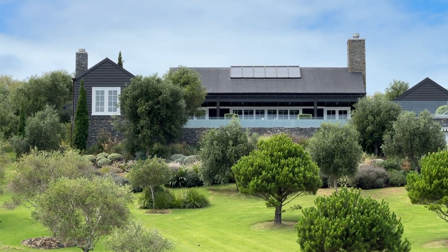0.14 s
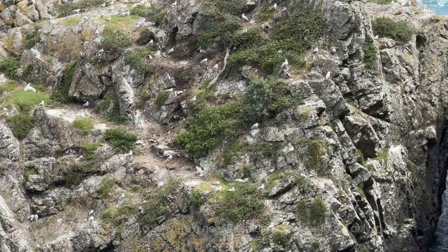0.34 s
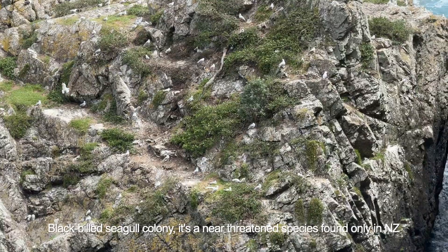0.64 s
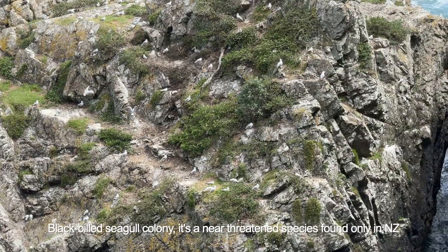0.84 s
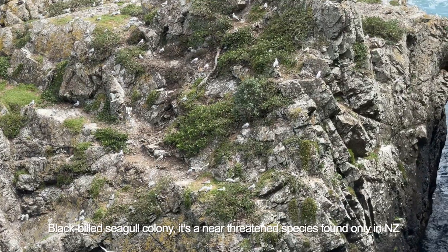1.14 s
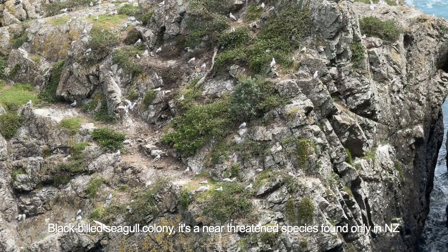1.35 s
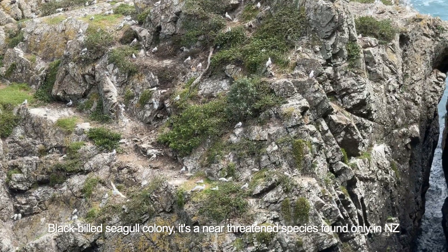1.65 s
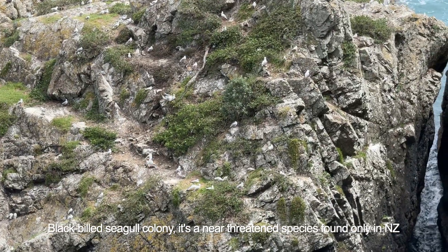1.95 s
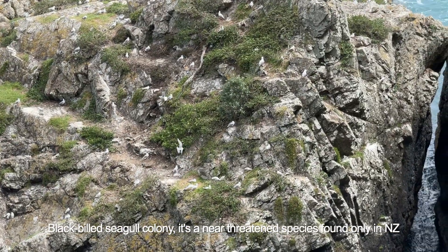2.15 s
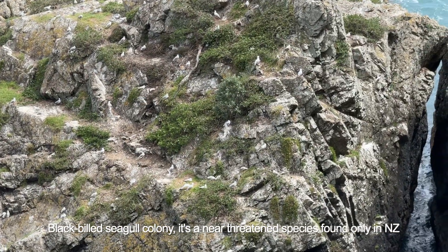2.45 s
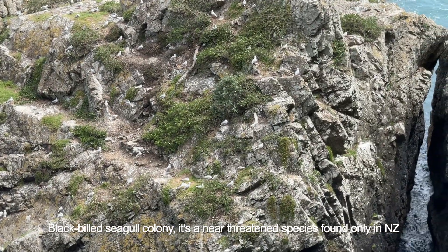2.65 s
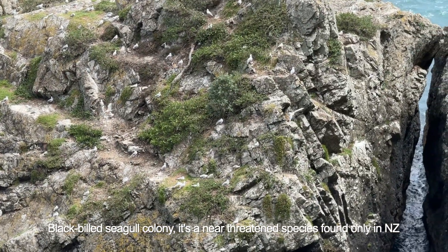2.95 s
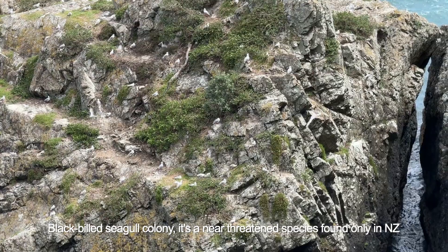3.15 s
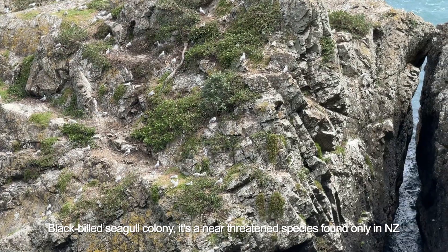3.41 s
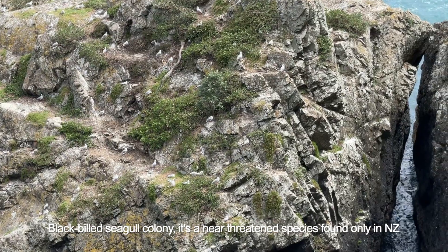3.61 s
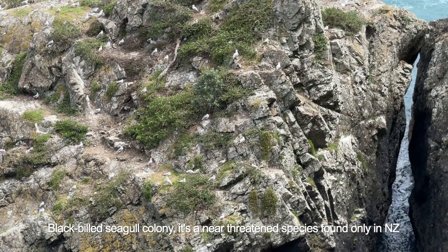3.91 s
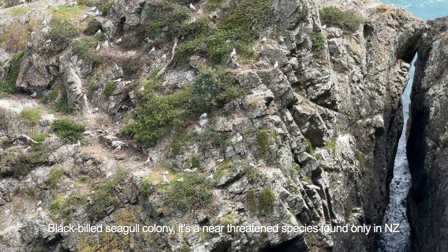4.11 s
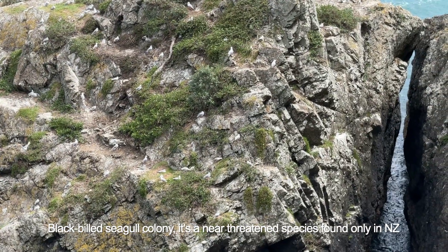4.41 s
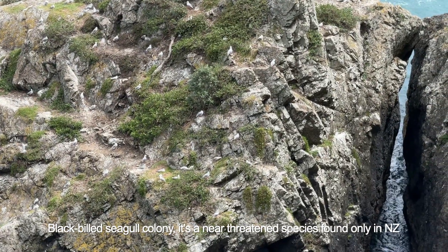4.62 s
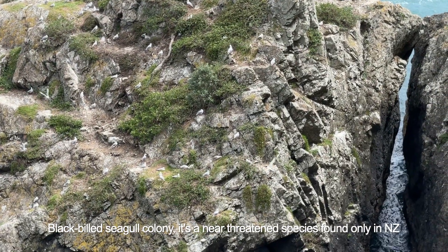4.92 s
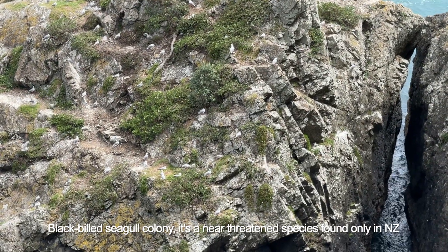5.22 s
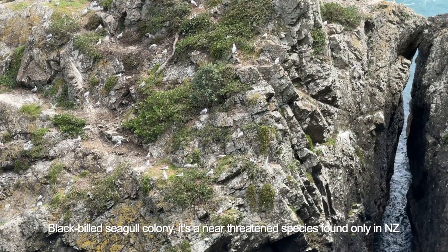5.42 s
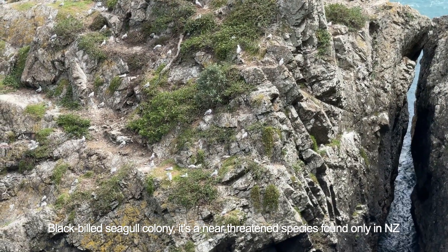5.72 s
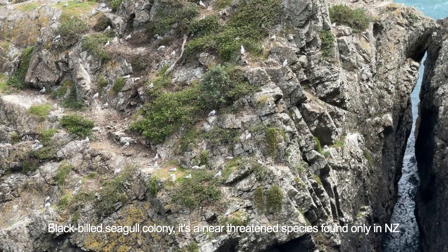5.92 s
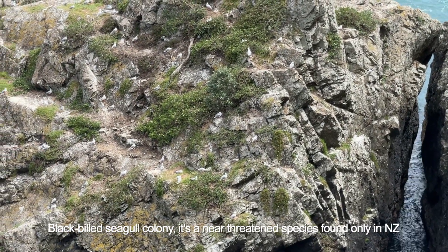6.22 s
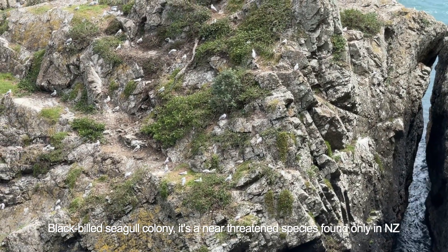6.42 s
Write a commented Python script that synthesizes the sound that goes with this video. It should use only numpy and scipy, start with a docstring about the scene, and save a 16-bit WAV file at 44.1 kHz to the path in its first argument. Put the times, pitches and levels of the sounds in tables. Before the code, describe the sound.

After a split second of near silence, a gull colony starts up on a sea cliff. Short, high, harsh cries, trills, yaps and thin whistles overlap above a distant chorus and a faint rush of surf. Wind buffets the microphone in uneven low rumbles and bumps, with one loud thump about two seconds in. The gulls keep calling to the end.

```python
"""Gulls cry, trill, yap and whistle on a sea cliff, each voice a gliding harmonic source shaped by the throat.
The rock scatters their calls back, and many distant birds sum to a chorus over the broadband noise of surf.
Turbulent gusts buffet and thump the microphone under a high hiss. The sound opens with a moment of
quiet garden (insects, one small bird) and then cuts to the colony."""
import sys
import numpy as np
from scipy import signal
from scipy.fft import rfft, irfft, next_fast_len
from scipy.io import wavfile
from scipy.ndimage import uniform_filter1d, map_coordinates

SR = 44100
rng = np.random.default_rng(int(sys.argv[2]) if len(sys.argv) > 2 else 0)


def waveform_to_disk(signal):
    """Save audio, clipped to [-1, 1], as 16-bit WAV at the path in sys.argv[1]."""
    frames = np.transpose(np.atleast_2d(signal))
    scaled = np.clip(frames, -1, 1) * 32767
    samples = np.round(scaled).astype(np.int16)
    wavfile.write(sys.argv[1], SR, samples)


N = 289296
CUT_S, TOP_HZ = .325, 15850  # garden gives way to colony; upper band limit

# Resonance curve of the throat: frequency_hz, gain_db
THROAT_RESPONSE = [(1000, -38.5), (2000, 0), (3500, 8.5), (6500, 4.5), (8300, -8.5), (9300, -16.5),
                   (16000, -66)]
def bird_voice(length_s, start_hz, mid_hz, end_hz, level_db, throb_hz, roughness, slope_db,
               subharmonic_db, attack_s=.0046, fade_share=.15):
    """Source and filter: the throat weights pulsed harmonics, which random modulation smears into noise."""
    n = max(round(length_s * SR), 64)
    u = np.arange(n) / n
    hz = start_hz * (1 - u) * (1 - 2 * u) + 4 * mid_hz * u * (1 - u) + end_hz * u * (2 * u - 1)
    drift = roughness * .21 * np.minimum(5 * u, 1) * wobble(22.9, n)
    beat = (throb_hz * u * length_s + drift) % 1
    hz *= 1 + throb_hz / 1500 * (beat - .35)  # the pitch sweeps up inside each throb
    hz *= 1 + .022 * roughness * wobble(40.08, n)
    phase = 2 * np.pi * np.cumsum(hz) / SR
    tilt_db = slope_db + 7 * (np.sin(np.pi * u) - 1)  # overtones swell with the effort in mid call
    voice = np.zeros(n)
    for k in np.arange(1, 9) / 2:  # multiples of half the pitch
        line_db = along(THROAT_RESPONSE, k * hz) + tilt_db * np.log2(max(k, 1))
        line_db += subharmonic_db * (k % 1 > 0)
        smear = roughness * 1.85 * np.sqrt(k) * wobble(380, n)
        flicker_db = 5 * roughness * wobble(203.5, n) + (2.42 + 2 * roughness) * wobble(20.24, n)
        voice += amp(line_db + flicker_db) * np.sin(k * phase + smear) * (k * hz < TOP_HZ)
    if throb_hz:  # a sharp start, then a gap that roughness fills
        voice *= .12 + roughness ** 2 / 2 + np.clip(np.minimum(beat / .12, (.7 - beat) / .3), 0, 1)
    envelope = np.clip(np.minimum(u * length_s / attack_s, (1 - u) / fade_share), 0, 1)
    return amp(level_db) * envelope * unit(voice)


# Harsh cries and trills: start_s, length_s, start_hz, end_hz, level_db, throb_hz, roughness,
# slope_db_per_octave, subharmonic_db
GULL_CRIES = [(0.336, 0.22, 3880, 3570, -52, 66, 0.88, 3, -4.5),
              (0.575, 0.33, 3330, 3100, -56.5, 100, 0.41, 1, -3),
              (0.816, 0.353, 3094, 3160, -47, 160, 0.59, -7, 36),
              (1.494, 0.19, 2550, 2340, -49, 77, 0.77, -10.5, -9),
              (1.681, 0.28, 3270, 3830, -58, 46, 0.41, -8, -30),
              (1.785, 0.27, 2297, 2790, -54.5, 58, 0.83, 2.5, -33),
              (1.834, 0.19, 3780, 4060, -49, 81, 0.44, -23, -11.5),
              (2.054, 0.21, 3270, 3180, -50.5, 96, 0.54, -21.5, -0.5),
              (2.188, 0.47, 1976, 1690, -53, 118, 0.66, -17, -10),
              (2.267, 0.13, 2920, 3100, -54, 60, 0.2, -36, -21),
              (2.376, 0.15, 5590, 5350, -48, 70, 0.77, -14, 0.5),
              (2.614, 0.232, 3700, 3400, -41.5, 37.5, 0.22, -10, -44),
              (3.028, 0.19, 2983, 2680, -45, 54.3, 0.7, 3.5, -8),
              (3.083, 0.4, 5745, 5170, -51.5, 59, 1, -25, -6.5),
              (3.11, 0.28, 3750, 3800, -53, 90, 0.77, -20, -25),
              (3.309, 0.25, 3480, 3450, -43, 36.8, 0.25, -20, -25),
              (3.409, 0.18, 2874, 2600, -46.5, 72, 1, -10.5, 2),
              (3.774, 0.27, 5530, 5500, -48.5, 79, 0.67, -16, -3),
              (4.14, 0.19, 3106, 3000, -47.5, 80, 0.43, 6, 1),
              (4.274, 0.14, 2310, 2530, -45, 84, 1.11, -18, -26),
              (4.344, 0.2, 3370, 3160, -60.5, 84, 0.3, 27, -5),
              (4.404, 0.077, 3210, 3650, -43.5, 41.3, 0.76, -43, 8),
              (4.584, 0.24, 2790, 3560, -44.5, 74, 0.39, -0.5, -8),
              (4.563, 0.3, 3320, 4250, -54, 87, 0.88, 23, -6.5),
              (4.666, 0.14, 2975, 2400, -45, 81, 1.09, -12, 1),
              (4.768, 0.48, 3210, 2680, -47.5, 66, 0.34, -11, -7),
              (5.112, 0.15, 3240, 3450, -51, 68.5, 0.9, 7, -12),
              (5.538, 0.21, 3125, 3900, -52.5, 100, 0.8, 12, -10),
              (5.826, 0.077, 3310, 2960, -51, 56, 0.8, 37, -9),
              (5.889, 0.29, 2960, 2740, -55.5, 81, 0.56, 16, 0),
              (6.059, 0.49, 3210, 2660, -45.5, 83, 0.38, -2, 3),
              (6.184, 0.39, 3750, 3440, -45, 85, 0.75, -0.5, -23)]
def gull_cries(trill_below_hz=42):
    """Amplitude modulation: slow throbs are heard as a trill, fast ones as a harsh cry that swells in."""
    track = np.zeros(N)
    for start_s, length_s, start_hz, end_hz, level_db, throb_hz, *timbre in GULL_CRIES:
        arch_hz = start_hz, (start_hz + end_hz) / 2 * 1.015, end_hz
        envelope = dict(attack_s=.025, fade_share=.37) if throb_hz > trill_below_hz else {}
        add(track, start_s, bird_voice(length_s, *arch_hz, level_db, throb_hz, *timbre, **envelope))
    return track


# Short clear yaps: start_s, length_s, pitch_hz, bend_share, level_db, slope_db_per_octave
GULL_YAPS = [(0.656, 0.051, 2670, -0.01, -44, -10), (0.724, 0.042, 4620, 0.017, -44.5, -11),
             (0.847, 0.042, 3066, 0.057, -43, -12), (0.904, 0.042, 2986, 0.01, -43.5, -12),
             (1.26, 0.037, 3240, 0.09, -40, 2.5), (1.338, 0.035, 3286, 0.13, -37, 8),
             (1.395, 0.047, 3204, 0.08, -40.5, 6), (1.377, 0.028, 4810, -0.06, -46, -25),
             (1.459, 0.052, 3220, 0.19, -44.5, 5.5), (1.67, 0.018, 4400, 0.01, -47, -26),
             (1.87, .045, 2596, 0.045, -44, -15), (2.819, 0.026, 4470, -0.31, -47, -17),
             (3.563, .03, 5900, -0.23, -52.5, -18), (3.869, 0.057, 3220, 0.054, -43, -3),
             (4.504, 0.02, 3580, 0.05, -47, -25), (4.539, .045, 4890, 0.18, -41.5, 4),
             (5.08, 0.023, 3560, 0.14, -37, -0.5), (5.145, 0.022, 5740, 0.05, -52, -32),
             (5.251, 0.035, 2685, -0.049, -44, -1.5), (5.307, 0.022, 2710, -0.03, -41, -15.5),
             (5.597, 0.023, 2860, 0.1, -43, -10.5), (5.645, 0.042, 2970, 0.098, -47, -20),
             (5.703, 0.032, 2840, 0.0064, -39, -20.5), (5.769, .04, 2533, -0.04, -46, -15),
             (6.061, 0.028, 3600, 0.042, -42.5, -12), (6.165, 0.047, 5200, -0.041, -45, -8),
             (6.343, 0.06, 2070, 0.068, -43, -15)]
def gull_yaps():
    """Voiced transients: brief harmonic bursts whose pitch hooks up or down at the end."""
    track = np.zeros(N)
    for start_s, length_s, hz, bend, level_db, slope_db in GULL_YAPS:
        yap = bird_voice(length_s, hz, hz * (1 + bend / 9), hz * (1 + bend), level_db, throb_hz=0,
                         roughness=.3, slope_db=slope_db, subharmonic_db=-15, fade_share=.5)
        add(track, start_s, yap)
    return track


# Thin whistles: start_s, length_s, start_hz, mid_hz, end_hz, level_db
GULL_WHISTLES = [(0.68, 0.145, 4550, 5370, 5050, -54), (.98, 0.18, 5150, 5430, 5050, -55),
                 (1.305, .04, 4900, 5400, 4600, -46), (2.495, 0.19, 5680, 5630, 5290, -54),
                 (2.745, .19, 4760, 4980, 4830, -58), (3.403, 0.06, 9300, 8700, 8000, -67),
                 (4.35, .17, 4400, 4950, 5150, -55), (4.635, 0.07, 5250, 4850, 4400, -49),
                 (5.0, .115, 4550, 4600, 5450, -58), (5.49, 0.14, 3950, 4150, 4300, -60),
                 (5.61, 0.29, 4180, 5080, 5030, -52), (5.67, .035, 5350, 5700, 4950, -50)]
def whistles(notes=GULL_WHISTLES):
    """Nearly pure tones: a steep spectral slope leaves one gliding line."""
    track = np.zeros(N)
    for start_s, *note in notes:
        add(track, start_s, bird_voice(*note, throb_hz=0, roughness=.25, slope_db=-22, subharmonic_db=-50))
    return track


# Gust impacts: start_s, level_db, pitch_hz
GUST_THUMPS = [(1.25, -30, 81), (1.317, -26.5, 247), (1.55, -26.5, 158), (1.9624, -10, 175),
               (2.17, -31.5, 346), (2.976, -36, 191), (3.477, -31, 590), (3.795, -36, 213),
               (4.007, -33, 276), (4.219, -30.5, 580), (4.68, -35.5, 154), (4.725, -28.5, 273),
               (4.911, -29, 157), (5.314, -24, 596), (5.513, -31.5, 220), (5.712, -31, 300),
               (5.847, -35, 267), (5.903, -25, 480)]
# Pitch sag of a thump, least for high taps: pitch_hz, sag_share
THUMP_SAG = [(90, 0.55), (160, 0.7), (300, 0.56), (550, 0.05)]
def gust_thumps():
    """Pressure pulses: the strongest eddies strike the microphone as damped tones of falling pitch."""
    track = np.zeros(N)
    for start_s, level_db, hz in GUST_THUMPS:
        cycles = np.arange(round(8 * SR / hz)) * hz / SR
        swell = (cycles / 1.64 * np.exp(1 - cycles / 1.174)) ** 1.47
        glide = 3 * along(THUMP_SAG, hz) * (1 - np.exp(-cycles / .89) - cycles / 4)
        phase = 2 * np.pi * (cycles + glide) + .4 * wobble(hz, len(cycles))
        add(track, start_s, amp(level_db) * swell * np.sin(phase))
    return track


# Strength of the buffeting: time_s, level_db
BUFFET_LEVELS = [(0, -67), (.36, -73.5), (.65, -47.5), (.9, -56), (1.2, -46.5), (1.42, -54.5),
                 (1.58, -43.5), (1.75, -59.5), (1.94, -43), (2.06, -37.5), (2.3, -65.5), (2.75, -60.5),
                 (3.1, -58.5), (3.65, -60), (4, -46), (4.5, -72), (4.85, -53.5), (5.3, -66), (5.9, -53),
                 (6.2, -62), (6.56, -64)]
# Spectrum of the eddies: frequency_hz, relative_density_db
BUFFET_SPECTRUM = [(30, -70), (63, -1.5), (140, -0.5), (254, -3), (455, -14), (563, -18.5), (900, -26.5),
                   (1170, -29), (1980, -120)]
def wind_buffet():
    """Turbulence: eddies at the microphone make low noise that comes in lumps."""
    lumps = amp(2.2 * wobble(15) + 2.6 * wobble(40))
    rumble = shaped_noise(BUFFET_SPECTRUM, side_db=-12, patchy_db=3.5)
    return amp(curves(BUFFET_LEVELS)[0]) * unit(lumps * rumble)


# Background of the colony: time_s, chorus_db, surf_db
COLONY_LEVELS = [(.36, -52.5, -66), (.65, -47.5, -53), (1.15, -46.5, -58), (1.4, -51.5, -54.5),
                 (1.75, -58, -56), (2.4, -54.5, -56.5), (2.95, -63.5, -57.5), (3.4, -48, -52),
                 (3.7, -61, -56.5), (4.1, -54.5, -58.5), (4.7, -52, -60.5), (5.4, -58.5, -56.5),
                 (6.3, -57, -58), (6.56, -52.5, -54.5)]
def far_gulls(count=420):
    """Incoherent summation: many distant calls overlap into a rough chorus."""
    track = np.zeros(N)
    for when, pitch, glide, length, level, throb, rough in rng.random((count, 7)):
        hz = 1750 * 2.8 ** pitch
        bend = 1 + .13 * (glide - .5)
        call = bird_voice(.044 + .202 * length ** 2, hz, hz * bend, hz * bend ** .5, 5 * level,
                          40 + 100 * throb, .22 + .5 * rough, slope_db=-7, subharmonic_db=-1.2)
        add(track, when * N / SR, call)
    chorus = spread(track, depth_rad=.12, rate_hz=8) + amp(-7) * cliff_echo(track, t60_s=.4, delay_s=.01)
    return amp(curves(COLONY_LEVELS)[0]) * unit(chorus)


# Spectrum of the surf: frequency_hz, relative_density_db
SURF_SPECTRUM = [(120, -7), (195, 7), (334, 10), (503, 2), (999, 1.5), (1350, -2.5), (3810, -4.5),
                 (8280, -25), (8800, -19), (9500, -79)]
def surf():
    """Broadband noise: waves in the gully below and wind over the scrub merge into a wavering rush."""
    level_db = curves(COLONY_LEVELS)[1] + 1.1 * wobble(5.29)
    return amp(level_db) * shaped_noise(SURF_SPECTRUM, side_db=-11, patchy_db=2.5)


# Strength of the hiss: time_s, level_db
HISS_LEVELS = [(0, -99.5), (.4, -61.5), (1.85, -69.5), (1.95, -72.5), (3, -70.5), (4, -77.5), (5.7, -76),
               (6.25, -59.5), (6.56, -81)]
# Spectrum of the hiss: frequency_hz, relative_density_db
HISS_SPECTRUM = [(8000, -61), (9000, 3), (12000, 14), (15000, 8)]
def high_hiss():
    """High-pass noise: a faint, flickering hiss swells and sinks."""
    return amp(curves(HISS_LEVELS)[0]) * shaped_noise(HISS_SPECTRUM, side_db=-24, patchy_db=4)


# Spectrum of the garden: frequency_hz, relative_density_db
GARDEN_SPECTRUM = [(180, -53), (300, -28), (1210, -17.5), (1500, -9), (2810, -22), (6980, -18.5),
                   (8660, 3.5), (9720, -65), (11100, -47), (14200, 2.5), (15700, -4)]
def garden_insects():
    """Band noise: insects sound as two treble peaks above a quiet noise floor."""
    return amp(-70) * shaped_noise(GARDEN_SPECTRUM, side_db=-8, patchy_db=2)


# Two chirps: start_s, length_s, start_hz, mid_hz, end_hz, level_db
GARDEN_CHIRPS = [(0.177, 0.054, 3470, 3950, 1100, -82), (0.224, 0.061, 3900, 3040, 2900, -80)]
def garden_bird():
    """Frequency sweeps: a small bird whistles two quick falling notes."""
    return whistles(GARDEN_CHIRPS)


def cliff_echo(x, t60_s, delay_s):
    """Diffuse reflection: rock faces scatter sound back, a little differently to each side."""
    t = np.arange(SR // 2) / SR
    mid, side = rng.standard_normal((2, len(t))) * amp(-60 * t / t60_s) * (t > delay_s)
    tail = np.array([mid + .073 * side, mid - .11 * side])
    return signal.fftconvolve(x[None], tail / np.linalg.norm(mid), axes=1)[:, :N]


def spread(x, depth_rad, rate_hz):
    """Phase difference: sound reaches the two channels with a wandering offset."""
    analytic = signal.hilbert(x, next_fast_len(N))[..., :N]
    return np.real(analytic * np.exp(1j * depth_rad * wobble(rate_hz) * np.array([[1], [-1]])))


def shaped_noise(spectrum, side_db, patchy_db):
    """Spectral shaping: stereo noise of rms 1, with patches of random gain in time and frequency."""
    bins = signal.stft(rng.standard_normal((2, N)), nperseg=512)[2]
    patches = uniform_filter1d(rng.standard_normal(bins.shape[1:]), size=6, axis=0)
    patches = unit(uniform_filter1d(patches, size=10, axis=1))
    pair = signal.istft(bins * amp(patchy_db * patches), nperseg=512)[1][:, :N]
    mid, side = filtered(pair, lambda hz: amp(along(spectrum, hz)))
    return unit(np.array([mid + amp(side_db) * side, mid - amp(side_db) * side]))


def amp(db):
    return 10 ** (np.asarray(db) / 20)


def unit(x):
    return x / np.sqrt(np.mean(x ** 2) + 1e-20)


def along(points, hz):
    """Interpolation on a logarithmic frequency axis."""
    knots_hz, values = np.transpose(points)
    return np.interp(np.log(hz + 1), np.log(knots_hz + 1), values)


def curves(rows):
    """Linear interpolation in time: one value per sample for each column after the first."""
    times_s, *columns = np.transpose(rows)
    return [np.interp(np.arange(N) / SR, times_s, column) for column in columns]


def wobble(rate_hz, size=N):
    """Smooth random modulation: a spline through rate_hz knots a second."""
    knots = rng.standard_normal(max(int(size * rate_hz / SR) + 4, 256))
    return map_coordinates(knots, [np.arange(size) * rate_hz / SR])


def filtered(x, response):
    """Linear filtering: the spectrum of x times a complex frequency response."""
    size = next_fast_len(N + SR // 2)
    return irfft(rfft(x, size) * response(np.fft.rfftfreq(size, 1 / SR)), size)[..., :N]


def add(track, start_s, sound):
    part = track[max(round(start_s * SR), 0):][:len(sound)]
    part += sound[:len(part)]


def scene():
    """Superposition: near birds and wind over a background that cuts from garden to colony."""
    t = np.arange(N) / SR
    colony_gate = np.clip((t - CUT_S) / .042, 0, 1)
    garden_gate = np.clip((CUT_S - t) / .029, 0, 1)
    insects, hiss = garden_insects(), high_hiss()
    calls = gull_cries() + gull_yaps() + whistles() + garden_bird()
    birds = spread(calls, depth_rad=.1, rate_hz=3.135)
    birds += amp(-12) * cliff_echo(calls, t60_s=.19, delay_s=.0039)
    wind = spread(wind_buffet() + gust_thumps(), depth_rad=.36, rate_hz=12)
    background = (far_gulls() + surf()) * colony_gate + insects * garden_gate
    return birds + (wind + hiss) * (colony_gate + garden_gate) + background


# Small phase offset between the channels: frequency_hz, left_lead_rad
CHANNEL_PHASE = [(300, 0), (1460, -0.2), (3360, 0.6), (6980, -0.3), (8530, 0.1)]
def record(dry):
    """Band-pass filtering and phase shift: deep bass and top treble are cut, and the image widens."""
    def response(hz):
        # the highest treble reaches the left channel 16 samples late, widening the hiss
        treble_lag_rad = 2 * np.pi * hz * 16 / SR * (hz > 8800)
        lead_rad = along(CHANNEL_PHASE, hz) - treble_lag_rad
        bass_cut = 1 / (1 + (42 / (hz + 1)) ** 4)
        return np.exp(.5j * lead_rad * np.array([[1], [-1]])) * bass_cut * (hz < TOP_HZ)
    return filtered(dry, response)


dry = scene()
out = record(dry)
waveform_to_disk(out)
```